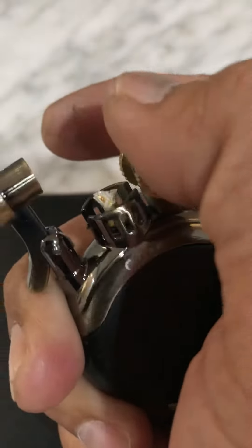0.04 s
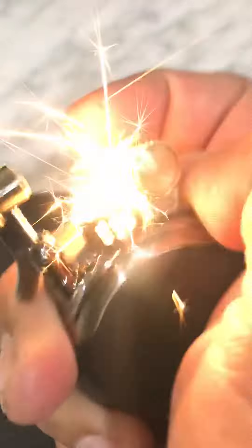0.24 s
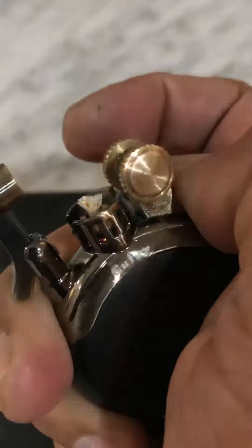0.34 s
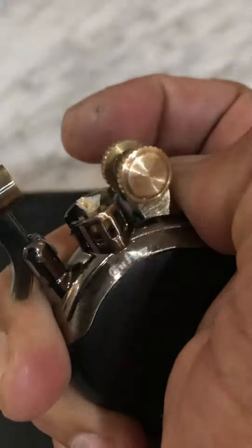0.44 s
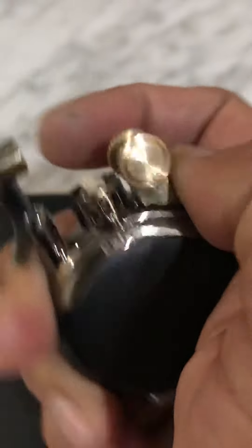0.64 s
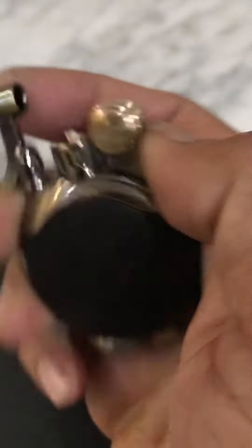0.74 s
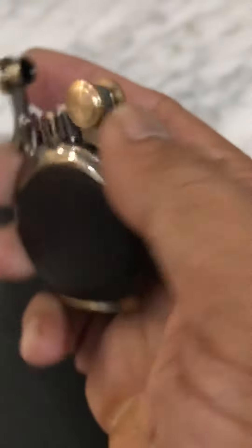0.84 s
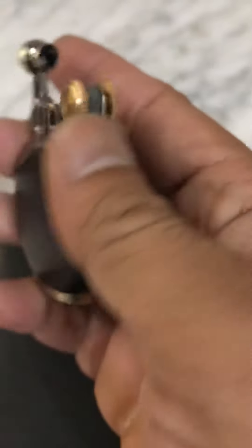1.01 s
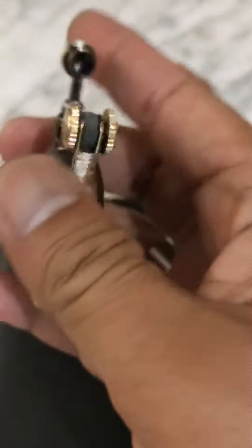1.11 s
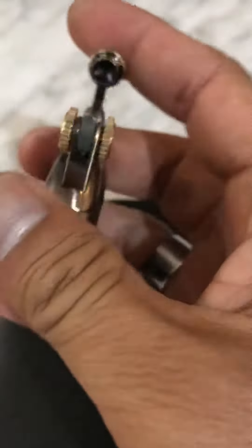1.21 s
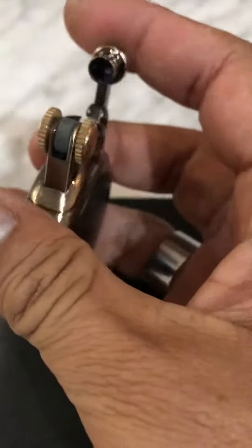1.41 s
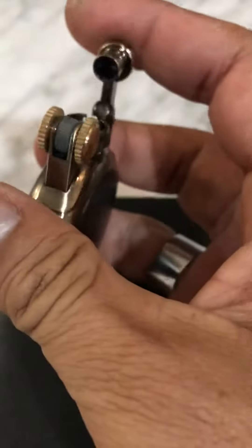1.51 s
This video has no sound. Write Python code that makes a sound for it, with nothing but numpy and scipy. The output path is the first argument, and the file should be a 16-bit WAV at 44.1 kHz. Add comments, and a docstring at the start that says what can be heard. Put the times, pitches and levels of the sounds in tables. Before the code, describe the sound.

One quick, bright flint rasp from a lighter, then faint handling clicks.

```python
"""In a small humming room, close by, a thumb takes up the steel wheel of a metal lighter.
Single teeth catch and the wheel creaks against the flint. It breaks free in a short sparking
rasp, the thumb bumps the case and the wheel runs on for a moment; gain control ducks the rasp.
Then the hand turns the lighter: faint clicks and the brush of skin."""
import sys
import numpy as np
from scipy import signal
from scipy.fft import rfft, irfft, next_fast_len
from scipy.io import wavfile
from scipy.ndimage import uniform_filter1d, map_coordinates

SR = 44100
rng = np.random.default_rng(int(sys.argv[2]) if len(sys.argv) > 2 else 0)


def generate_wav(signal):
    """Clip the signal to [-1, 1] and save it as 16-bit WAV at the path in sys.argv[1]."""
    frames = np.transpose(np.atleast_2d(signal))
    scaled = np.clip(frames, -1, 1) * 32767
    pcm = np.round(scaled).astype(np.int16)
    wavfile.write(sys.argv[1], SR, pcm)


N = 68355
T = np.arange(N) / SR
N_FFT = 2 * next_fast_len(N)
BIN_HZ = np.fft.rfftfreq(N_FFT, 1 / SR)


def amp(db):
    """Decibels to gain."""
    return 10 ** (np.asarray(db) / 20)


def unit(x):
    """Scale to rms 1."""
    return x / np.sqrt(np.mean(x ** 2) + 1e-20)


def along(points, hz):
    """Interpolate (f/Hz, value) points on a log axis."""
    f, values = np.transpose(points)
    return np.interp(np.log(hz + 1), np.log(f + 1), values)


def envelope(points):
    """Gain per sample from (t/s, level/dB) points; silent outside them."""
    return amp(np.interp(T, *np.transpose(points), left=-np.inf, right=-np.inf))


def decay(start_s, t60_s):
    """Sudden onset, exponential decay."""
    return (T >= start_s) * np.exp(-np.log(1000) * np.abs(T - start_s) / t60_s)


def filtered(x, response):
    """Apply a response on BIN_HZ, rolled off at 17 kHz and scaled to mean power gain 1."""
    h = response / (1 + (BIN_HZ / 17000) ** 40)
    return irfft(rfft(x, N_FFT) * h / np.sqrt(np.mean(np.abs(h) ** 2)), N_FFT)[:N]


def coloured(x, spectrum):
    """Minimum-phase filter shaped by (f/Hz, level/dB) points."""
    cepstrum = irfft(np.log(amp(along(spectrum, BIN_HZ))))
    return filtered(x, np.exp(rfft(2 * cepstrum[:N_FFT // 2], N_FFT)))


def resonate(x, modes, cutoff_hz=1978):
    """Resonances of a small body that radiates little below the cutoff."""
    s = 1j * BIN_HZ
    bank = sum(amp(db) * s * width / (hz ** 2 + s * width + s ** 2) for hz, width, db in modes)
    return filtered(x, bank * (s / (cutoff_hz + s)) ** 2)


def grit(spread_db):
    """Dense grains of uneven size, rms 1."""
    return unit(rng.standard_normal(N) * amp(spread_db * rng.standard_normal(N)))


def flint_scrape(tooth_hz=613, count=60, jitter=.1, spread_db=3, drag=.5):
    """Tooth after tooth scrapes the flint, with friction drag in between."""
    # wheel's run over the flint: t/s, level/dB
    stroke = [(.190, -64), (.1932, -40.5), (.197, -44), (.2008, -38), (.2045, -52), (.2075, -30),
              (.2115, -25.5), (.2132, -23.5), (.221, -15), (.225, -22), (.228, -22.5), (.2315, -27.5),
              (.2335, -25), (.236, -21), (.239, -18.5), (.2415, -23), (.244, -16.5), (.249, -40.5),
              (.262, -58.5)]
    timing, sizes = rng.standard_normal((count, 2)).T
    onsets_s = stroke[0][0] + (np.arange(count) + jitter * timing) / tooth_hz
    teeth = sum(amp(spread_db * size) * decay(t, t60_s=.004) for t, size in zip(onsets_s, sizes))
    effort = envelope(stroke)
    scrape = effort * (drag + teeth) * grit(spread_db=2.5)
    return scrape * np.linalg.norm(effort) / np.linalg.norm(scrape)


def tooth_catches():
    """Single teeth catch as the thumb takes up the wheel."""
    # catches: t/s, level/dB
    events = [(.1522, -51), (0.1688, -26.5), (0.1705, -36), (0.185, -45.5), (0.2009, -21)]
    return sum(amp(db) * decay(t, t60_s=.0043) for t, db in events) * rng.choice([-1, 1], N)


def tooth_bites():
    """The wheel's teeth bite the flint in loud, bright snaps at the height of the stroke."""
    # bites: t/s, level/dB
    events = [(.2130, -13), (0.2174, -10), (0.2189, -2), (0.2206, -2.5), (0.2239, -4), (0.24, -7.5)]
    return sum(amp(db) * decay(t, t60_s=.0032) for t, db in events) * rng.choice([-1, 1], N)


def wheel(scrape, catches, bites, free_s=.2185, blend_s=.006, grip_db=2, spark_db=1, ring_db=-12):
    """The lighter's response: dull and ringing while gripped, bright once the wheel breaks free."""
    # modes of the gripped lighter: f/Hz, width/Hz, level/dB
    body_modes = [(2450, 330, 1.5), (3360, 220, -2), (3870, 320, 0), (5720, 300, -6), (5900, 270, 3.5),
                  (6420, 200, -13), (8800, 690, -6), (10000, 420, -7.5), (11800, 800, -6),
                  (12400, 500, -5.5), (14200, 640, -4.5), (15220, 700, -6.5)]
    # rasp while sparks fly: f/Hz, level/dB
    spark_spectrum = [(100, -16), (370, -18.5), (600, -15.5), (800, -18), (1000, -9), (1600, -7.5),
                      (2000, -10.5), (2670, -2), (4200, -7.5), (4900, -10.5), (5600, -6.5), (7200, -11),
                      (8400, -2.5), (10600, -7), (12800, 3.5), (15800, -1)]
    # sharp rings of wheel and case: f/Hz, width/Hz, level/dB
    ring_modes = [(2650, 96, -4.5), (3690, 60, 6), (5730, 46, 1), (8300, 170, -4), (9280, 40, -7.5),
                  (11000, 70, -6), (10260, 77, -6.5), (11580, 60, -5.5), (12000, 39, -2.5),
                  (12520, 45, 0.5), (13860, 120, -1.5), (14100, 60, 1), (14930, 70, 2.5), (15340, 80, 2)]
    free = .5 + .5 * np.tanh((T - free_s) / blend_s)
    gripped = resonate(amp(grip_db) * scrape * np.sqrt(1 - free) + catches, body_modes)
    sparking = coloured(amp(spark_db) * scrape * np.sqrt(free) + bites, spark_spectrum)
    return gripped + sparking + amp(ring_db) * resonate(scrape, ring_modes)


def thumb(centre_s=.227, width_s=.013, level_db=-36.5):
    """The thumb slips off the wheel and bumps the case."""
    # dull bump of flesh: f/Hz, level/dB
    spectrum = [(30, -25), (60, -10), (90, -3), (140, 3), (240, -1), (400, -9), (650, -16.5), (1100, -25.5),
                (4000, -62)]
    swell = np.exp(-.5 * ((T - centre_s) / width_s) ** 2)
    return amp(level_db) * swell * unit(coloured(rng.standard_normal(N), spectrum))


def loose_parts():
    """Loose parts click and tick as the lighter shifts in the hand."""
    # clicks: t/s, level/dB, T60/s
    click_events = [(.446, -64, 0.013), (.479, -63, .015), (.505, -61, 0.045), (.629, -65, 0.019),
                    (.6995, -49.5, 0.11), (.718, -61.5, 0.082), (.735, -59.5, .05)]
    # resonances of the clicks: f/Hz, width/Hz, level/dB
    click_modes = [(2960, 270, 3.5), (3600, 690, -7), (6360, 1800, -11.5), (8940, 900, -11),
                   (11260, 2000, -14.5), (14400, 3800, -12)]
    # bright ticks of flint dust and mechanism: t/s, level/dB
    tick_events = [(0.447, -61), (.479, -63), (.514, -60)]
    tick_hz, tick_width_hz = 14700, 1800
    clicks = sum(amp(db) * decay(t, t60_s) for t, db, t60_s in click_events) * rng.standard_normal(N)
    ticks = sum(amp(db) * decay(t, t60_s=.0097) for t, db in tick_events) * rng.standard_normal(N)
    return resonate(clicks, click_modes) + resonate(ticks, [(tick_hz, tick_width_hz, 0)])


def skin_brush(flutter_hz=70, flutter_db=2):
    """Skin sticks and slips over the turning case."""
    # brushing: t/s, level/dB
    contour = [(.4, -73.5), (.51, -78), (.56, -80), (.68, -69.5), (.77, -69), (.81, -65), (.87, -63),
               (.94, -75), (1.04, -80), (1.11, -71), (1.2, -70.5), (1.3, -76), (1.44, -74), (1.55, -77.5)]
    # skin friction: f/Hz, level/dB
    spectrum = [(500, -12), (2500, -10), (6000, 6), (10000, 0.5), (15000, 6)]
    flutter = map_coordinates(rng.standard_normal(512), [T * flutter_hz])
    friction = envelope(contour) * amp(flutter_db * flutter) * grit(spread_db=4.5)
    return coloured(friction, spectrum)


def room_echo(contact, hand, level_db=-22, build_s=.0048):
    """Faint diffuse tail of flint contact and hand; treble dies first."""
    # scrape as radiated in all directions: f/Hz, level/dB
    radiation = [(200, -11), (700, -4), (1500, -3), (2800, 2), (4200, -3), (5000, -3.5), (6000, 0.5),
                 (7500, -2.5), (10500, -1), (13000, 0), (15500, 0)]
    # room decay: f/Hz, T60/s
    decay_times = [(300, .4), (3000, 0.36), (8000, 0.34), (15000, .3)]
    hz, t, noise = signal.stft(rng.standard_normal(SR // 2), SR, nperseg=256)
    damping = np.exp(-np.log(1000) * t / along(decay_times, hz)[:, None])
    tail = signal.istft(noise * damping, SR, nperseg=256)[1]
    tail *= 1 - np.exp(-(np.arange(len(tail)) / SR / build_s) ** 2)
    source = coloured(contact, radiation) + hand
    return amp(level_db) * signal.fftconvolve(source, tail / np.linalg.norm(tail))[:N]


def hum_and_air(air_db=-52.5):
    """A motor's low hum over the rush of room air."""
    # motor tones: f/Hz, rms level/dB
    tones = [(48.4, -46.5), (199.5, -57), (303, -67.5), (345, -70)]
    # room noise: f/Hz, level/dB
    air_spectrum = [(20, -39.5), (33, -26), (50, -8), (62, -5), (78, -16), (105, 4), (135, -4), (200, -0.5),
                    (260, -5.5), (320, -2.5), (420, -15), (600, -18.5), (800, -20.5), (1200, -17.5),
                    (1550, -26.5), (3000, -30.5), (6000, -40.5), (10000, -44.5), (15500, -42.5)]
    hum = sum(np.sqrt(2) * amp(db) * np.sin(2 * np.pi * (hz * T + rng.random())) for hz, db in tones)
    return hum + amp(air_db) * unit(coloured(rng.standard_normal(N), air_spectrum))


def scene():
    """Lighter and hand close by, their echo and the room's own sound; mono."""
    scrape, catches, bites = flint_scrape(), tooth_catches(), tooth_bites()
    hand = thumb() + loose_parts() + skin_brush()
    echo = room_echo(scrape + catches + bites, hand)
    return (wheel(scrape, catches, bites) + hand + echo + hum_and_air())[None]


def record(dry):
    """Gain control ducks on the rasp and recovers slowly; a steep low-pass follows."""
    threshold_db, attack_s, release_db_per_s = -16, .016, 25.5
    top_hz, edge_hz = 15880, 60
    power = np.abs(uniform_filter1d(dry[0] ** 2, size=256))
    over_db = np.maximum(10 * np.log10(power + 1e-12) - threshold_db, 0)
    held_db = np.maximum.accumulate(over_db + release_db_per_s * T) - release_db_per_s * T
    pole = np.exp(-1 / (attack_s * SR))
    duck_db = signal.lfilter([1 - pole], [1, -pole], held_db)
    low_pass = .5 - .5 * np.tanh((BIN_HZ - top_hz) / edge_hz)
    return irfft(rfft(dry * amp(-duck_db), N_FFT) * low_pass, N_FFT)[:, :N]


dry = scene()
out = record(dry)
generate_wav(out)
```